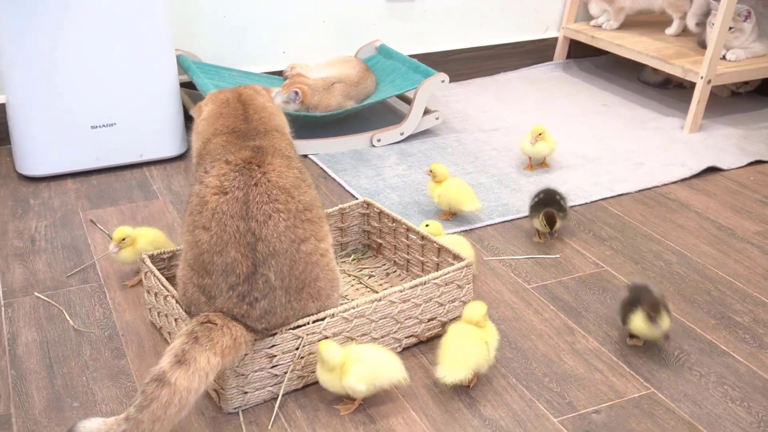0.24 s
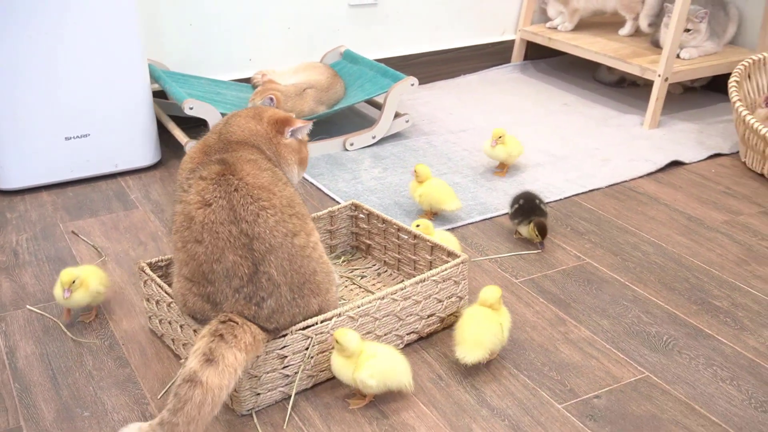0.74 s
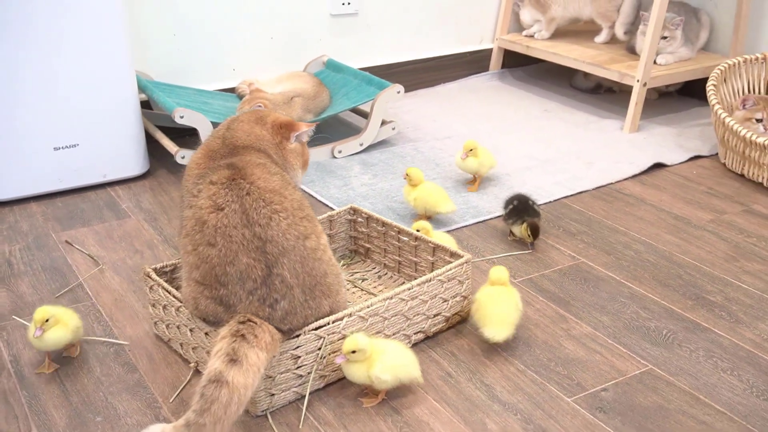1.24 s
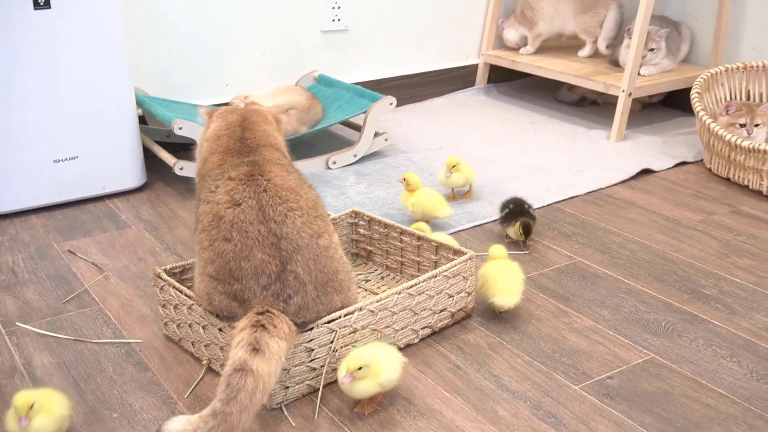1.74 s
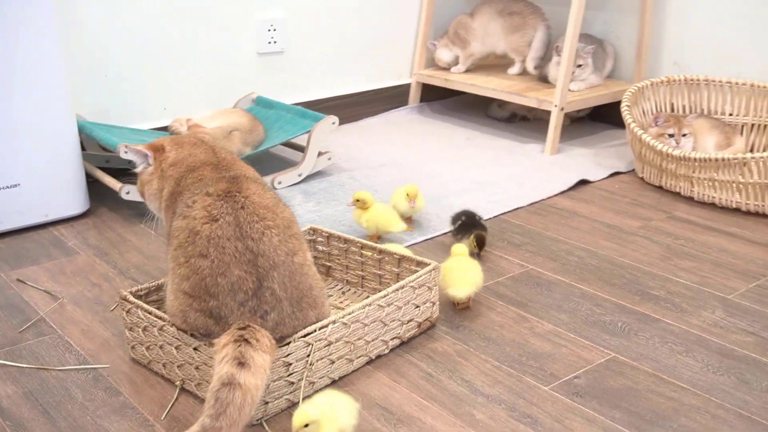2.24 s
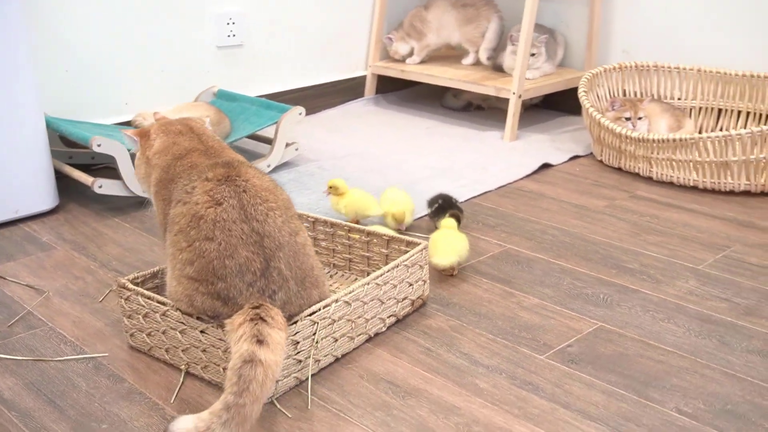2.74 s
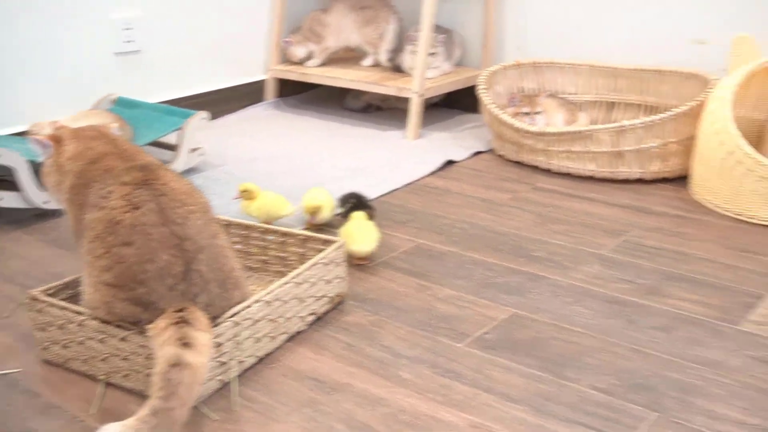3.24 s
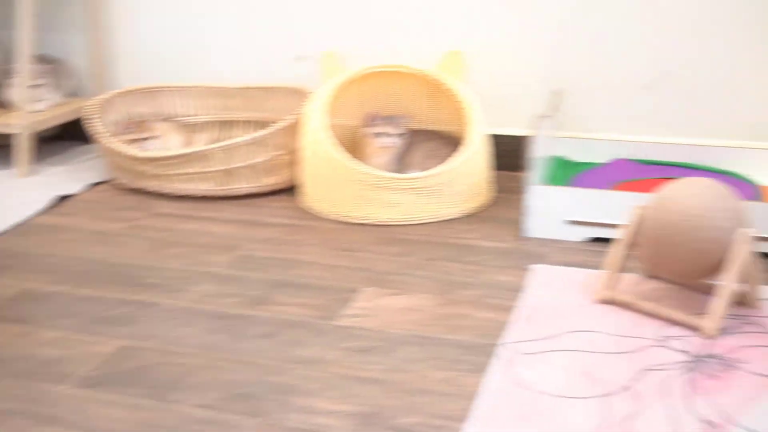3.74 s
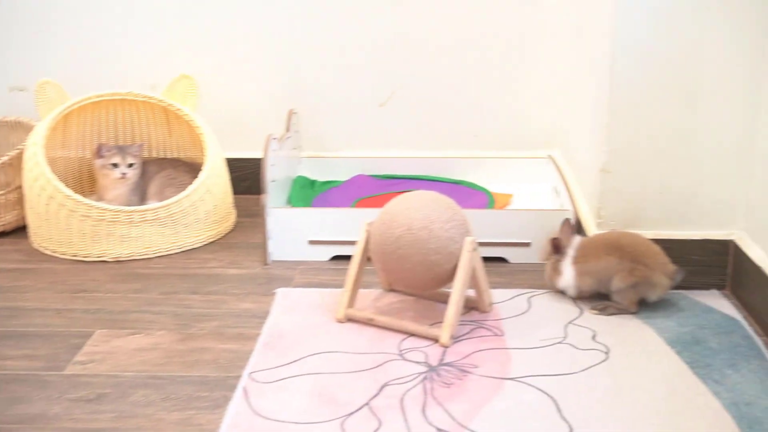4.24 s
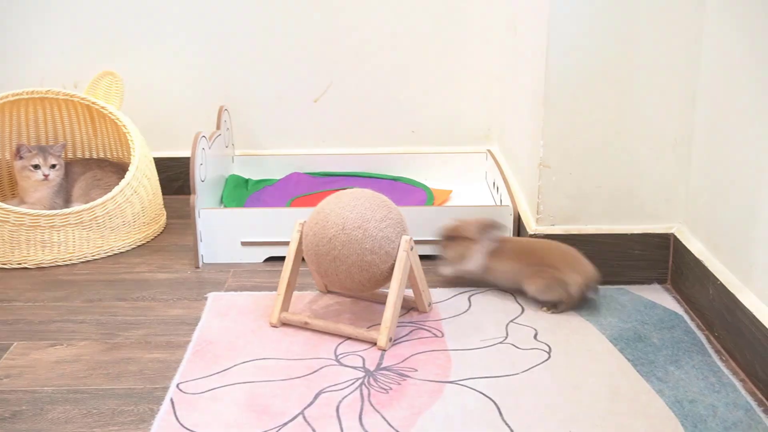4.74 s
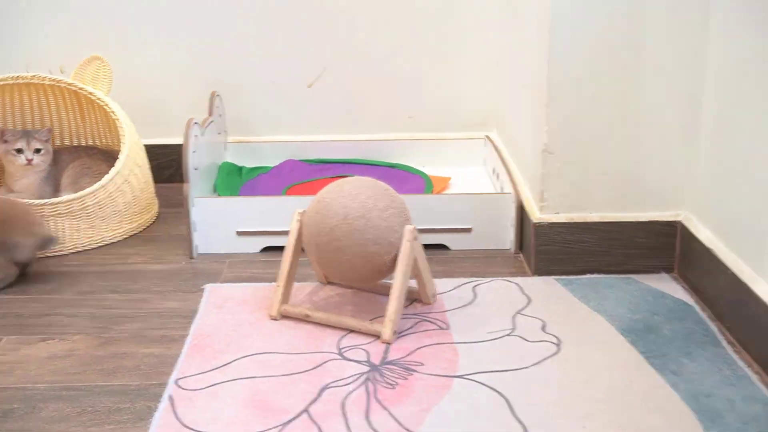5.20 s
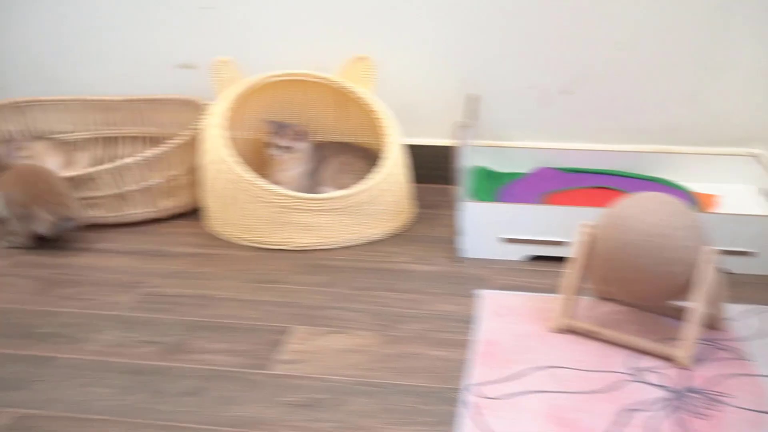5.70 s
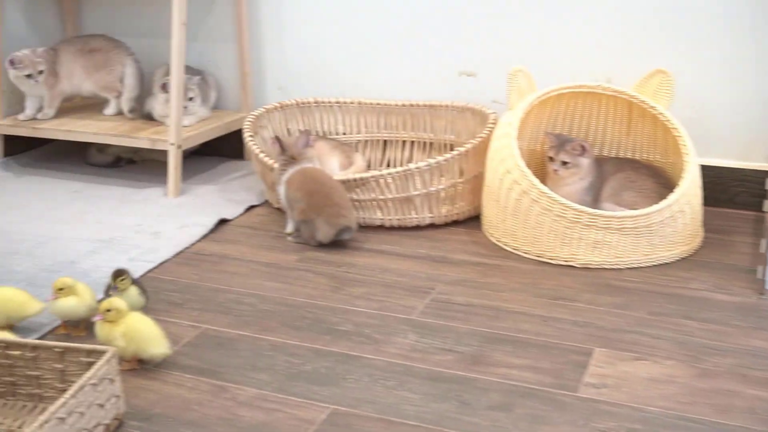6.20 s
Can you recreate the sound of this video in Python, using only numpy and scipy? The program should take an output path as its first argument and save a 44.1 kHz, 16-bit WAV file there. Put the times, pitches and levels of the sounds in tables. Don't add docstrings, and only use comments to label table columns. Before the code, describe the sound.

Bright duckling cheeps and light foot scuffs over a faint fan hum, then a rabbit bumps thin boards and peeping resumes.

```python
import sys
import numpy as np
from scipy import signal
from scipy.fft import rfft, irfft
from scipy.io import wavfile
from scipy.ndimage import uniform_filter1d

SR = 44100
rng = np.random.default_rng(int(sys.argv[2]) if len(sys.argv) > 2 else 0)


def field_ratio(decibels):
    return 10 ** (np.asarray(decibels, dtype=float) / 20)


def store_wav(level_fs):
    pcm = np.round(np.clip(np.atleast_2d(level_fs), -1, 1) * 32767)
    wavfile.write(sys.argv[1], SR, pcm.T.astype(np.int16))


N = 284886
T = np.arange(N) / SR


def unit(x):
    return x / np.sqrt(np.mean(x ** 2))


def colour(x, points):
    hz, db = np.transpose(points)
    size = x.shape[-1]
    bins = np.arange(size // 2 + 1) * SR / size + 1
    gain = field_ratio(np.interp(np.log(bins), np.log(hz), db))
    return irfft(rfft(x) * gain, size)


def band(x, low_hz, high_hz):
    edges = [low_hz, min(high_hz, .45 * SR)]
    return signal.sosfilt(signal.butter(2, edges, "band", fs=SR, output="sos"), x)


def follow(points):
    return np.interp(T, *np.transpose(points))


def late(x, delay_s):
    return np.concatenate([np.zeros(int(delay_s * SR)), x])[:N]


def add(track, start_s, sound):
    i = int(start_s * SR)
    track[i:i + len(sound)] += sound[:N - i]


def walk(rate_hz):
    hold = int(SR / rate_hz)
    jumps = np.repeat(rng.standard_normal(N // hold + 1), hold)
    smooth = uniform_filter1d(uniform_filter1d(jumps, hold), hold)
    return unit(smooth[:N])


def swells(rows, rest_db):
    bells = sum(field_ratio(db) * np.exp(-((T - s) / half_s) ** 2) for s, db, half_s in rows)
    return field_ratio(rest_db) + bells


def spread(mid, side):
    # (frequency [Hz], side minus mid [dB])
    side_points = [(60, -17), (150, -10.5), (350, -4.5), (700, -1.5), (1290, -0.5), (2600, -1.5),
                   (5000, 0.5), (15000, -1)]
    side = colour(side, side_points)
    return np.array([mid + side, mid - side])


def room(x, build_s=0.0021, sparse_db=-1.5, side_db=-3.5):
    # (frequency [Hz], fade time [s])
    fade_times = [(100, 1), (300, 0.54), (1000, 0.51), (3000, 0.57), (8000, 0.2), (15000, 0.36)]
    hz, t60 = np.transpose(fade_times)
    t = np.arange(SR) / SR
    sizes = np.minimum(rng.exponential(size=SR // 30).repeat(30), 4)
    lumps = field_ratio(sparse_db * np.exp(-t / 0.41) * sizes)
    tail = 0
    for low_hz in 44 * 2. ** np.arange(9):
        fade_s = np.interp(np.log(low_hz * 1.43), np.log(hz), t60)
        octave = band(rng.standard_normal((2, SR)) * lumps, low_hz, 2 * low_hz)
        tail = tail + octave * field_ratio(-60 * t / fade_s)
    build_up = 1 - np.exp(-(t / max(build_s, .005)) ** 2)
    tail = spread(tail[0], tail[1] * field_ratio(side_db)) * build_up
    tail = tail / np.sqrt(np.sum(tail ** 2) / 2)
    return signal.fftconvolve(x[None], tail, axes=1)[:, :N]


def contact(noise, length_s, tap=0.65):
    push = noise * np.exp(-np.arange(len(noise)) / SR / max(length_s, .002))
    push = push / np.sqrt(np.sum(push ** 2))
    push[0] += tap
    return push / np.sqrt(np.sum(push ** 2))


def air():
    # (frequency [Hz], level [dB per Hz])
    hiss_colour = [(22, -3), (113, 0.5), (600, -10), (900, -15.5), (1880, -16.5), (2500, -11),
                   (4160, -16.5), (15000, -20)]
    tone = unit(spread(*colour(rng.standard_normal((2, N)), hiss_colour)))
    whirr = unit(spread(*band(rng.standard_normal((2, N)), 768, 872))) * field_ratio(-13.0)
    return (tone + whirr) * field_ratio(-54.5 + .6 * walk(3))


def stir():
    # (time [s], bustle [dB])
    bustle_points = [(0, -42), (.21, 5), (.34, -2.5), (.7, -7), (1.06, -38), (1.93, -20), (2.34, -30),
                     (2.82, -12), (3.2, -4.5), (3.58, -4.5), (3.73, -26), (4.3, -1), (4.8, 1), (4.89, 13),
                     (5.16, -2), (5.68, -1.5), (5.9, -16.5), (6.35, -6.5)]
    # (time of crest [s], level [dB], half length [s])
    hum_swells = [
        (.25, -59, 0.28),
        (.85, -61.5, 0.12),
        (1.3, -60.5, 0.15),
        (3.71, -55, 0.057),
        (5.1, -47.5, 0.14),
        (5.98, -49, 0.2),
    ]
    # (time of crest [s], level [dB], half length [s])
    drone_swells = [
        (2.5, -67, 0.055),
        (3.55, -57, .12),
        (4.9, -53, 0.11),
        (5.18, -56, 0.17),
        (6.3, -56, 0.21),
    ]
    bustle_db = follow(bustle_points)
    sizes = np.minimum(rng.exponential(size=N // 40 + 1), 4).repeat(40)[:N]
    grains = rng.standard_normal((2, N)) * field_ratio(2.0 * sizes)
    rustle = unit(spread(*band(grains, 2100, 13200))) * field_ratio(-53 + bustle_db)
    rumble = unit(spread(*band(rng.standard_normal((2, N)), 67, 1760)))
    rumble = rumble * field_ratio(-59.5 + 0.44 * bustle_db)
    hum = unit(band(rng.standard_normal(N), 63.8, 69)) * swells(hum_swells, -87)
    drone = unit(band(rng.standard_normal(N), 104.6, 149)) * swells(drone_swells, -80.5)
    return rustle + rumble + hum + drone


def pings():
    # (time [s], pitch [Hz], level [dB], ring [s])
    notes_rung = [
        (.17, 696, -47.5, 0.014),
        (3.05, 1756, -52, 0.026),
        (4.456, 446, -56.5, 0.045),
        (4.58, 10200, -38.5, 0.0022),
        (4.799, 123, -68, 0.13),
        (4.824, 232, -44, 0.034),
        (4.898, 240.6, -34.5, 0.056),
        (4.897, 123.3, -45.5, 0.17),
        (4.905, 2216, -30.5, 0.011),
    ]
    t, dry = np.arange(SR) / SR, np.zeros(N)
    for s, hz, db, ring_s in notes_rung:
        fade = np.exp(-t / ring_s) * (1 - np.exp(-t / 0.0011))
        add(dry, s, field_ratio(db) * np.sin(2 * np.pi * hz * t) * fade)
    return 1.83 * dry + room(dry, side_db=-20.0)


def knock():
    # (pitch [Hz], level [dB], ring [s])
    board_notes = [(261.5, -0.5, 1.16), (313, -11, 0.35), (378, -19, 1.4), (522, -23, 1.4),
                   (598, -16, 0.22), (760, 3, 1), (900, -14, 1.5), (1280, -23, 0.33)]
    # (frequency [Hz], level [dB per Hz])
    crack_colour = [(100, -34), (240, 0.5), (350, -12), (650, 2.5), (1150, -16), (2600, -12), (6000, -17),
                    (15500, -33.5)]
    t = np.arange(SR // 2) / SR
    ring = 0
    for hz, db, ring_s in board_notes:
        ring = ring + field_ratio(db) * np.sin(2 * np.pi * hz * t) * field_ratio(-60 * t / (0.45 * ring_s))
    clatter = late(contact(rng.standard_normal(len(t)), .035, tap=.42), .01)
    crack = unit(colour(clatter, crack_colour))[int(.009 * SR):][:len(t)]
    blow = np.zeros(N)
    add(blow, 4.894 - .001, (0.44 * crack + 0.27 * ring) * field_ratio(-33.5))
    return 1.1 * blow + 1.5 * room(blow, side_db=-11.0)


def steps():
    # (time [s], claw click [dB], weight [dB], direct path [dB])
    patter = [(.1994, -54, -49.5, -1), (.3436, -44.5, -57, 1), (.42, -43.5, -61, -8), (.6667, -51, -73, 0),
              (.9405, -54, -70, -13), (1.8614, -53, -58, -0.5), (2.1134, -49, -53, -3),
              (2.619, -55, -53, 0), (2.8672, -59, -61.5, 15.5), (3.062, -37, -40.5, -4),
              (3.1294, -51, -55.5, -2), (3.2295, -40.5, -48, -7), (3.5002, -44, -54.5, -4),
              (3.6194, -51.5, -58.5, 1), (4.678, -65, -41.5, -1.5), (4.79, -59, -49, -12),
              (4.819, -70, -36.5, -1), (5.18, -44, -49, 1), (5.4031, -41, -41.5, -5),
              (6.4318, -47.5, -56, -7)]
    # (time [s], claw click [dB], weight [dB], direct path [dB])
    thuds = [
        (.051, -70, -65.5, 13),
        (.1289, -43, -57.5, -3),
        (.1635, -37, -46.5, -5),
        (2.9422, -73, -75, 5),
        (4.0298, -72, -60, 11),
        (4.3374, -46, -63, -8),
    ]
    # (time [s], claw click [dB], weight [dB], direct path [dB])
    drags = [
        (1.556, -49, -55.5, -21),
        (3.0121, -44, -52.5, -26),
        (4.1975, -44, -59, -5),
        (4.578, -51, -56, -2),
        (4.7289, -43, -40, 0),
    ]
    # (steps, scuff [dB], thud [dB]), both against the weight
    gaits = [(patter, 0.39, -0.94), (thuds, -25, .1), (drags, 0.14, -19)]
    feet = [(*row, scuff_db, thud_db) for rows, scuff_db, thud_db in gaits for row in rows]
    direct, far = np.zeros(N), np.zeros(N)
    scrapes = rng.standard_normal((len(feet), 4000))
    scrapes = scrapes * (1 - np.exp(-np.arange(4000) / SR / .007))
    for scrape, (s, click_db, weight_db, direct_db, scuff_db, thud_db) in zip(scrapes, feet):
        length_s = 2.3 * (0.0045 - .0004 * direct_db)
        push = contact(scrape, length_s, tap=.06)
        claw = field_ratio(click_db + 29.5) * band(push, 4040, 20000)
        scuff = field_ratio(weight_db + scuff_db + 37) * band(push, 925, 3250)
        thud = field_ratio(weight_db + thud_db + 43) * band(push, 187, 1260)
        burst = claw + scuff + thud
        add(direct, s, burst * field_ratio(direct_db - 8))
        add(far, s, burst)
    return direct + room(far, build_s=0.0083)


def peep(top_hz, end_hz, fall_s, ease, octave_db, wobble, bend=1.2):
    hook_s, scoop, rise_s = .012, .13, .016
    t = np.arange(-hook_s, fall_s, 1 / SR)
    progress = np.clip(t / fall_s, 0, 1)
    drop = 1 - (1 - progress ** bend) ** ease
    rising_hz = top_hz * (1 - scoop * (t / hook_s) ** 2)
    falling_hz = top_hz - (top_hz - end_hz) * drop
    hz = np.where(t < 0, rising_hz, falling_hz)
    phase = 2 * np.pi * np.cumsum(hz * (1 + 0.0015 * wobble[:len(t)])) / SR
    fade_in = np.sin(np.pi / 2 * np.clip((t + hook_s) / rise_s, 0, 1)) ** 2
    swell = fade_in * np.clip((fall_s - t) / .016, 0, 1)
    overtones = field_ratio(octave_db) * np.sin(2 * phase) + field_ratio(-30.5) * np.sin(3 * phase)
    return swell * field_ratio(1.44 * wobble[-len(t):]) * (np.sin(phase) + overtones), hook_s


def ducklings():
    # (time of top [s], top [Hz], end [Hz], level [dB])
    caller = [(1.578, 3860, 2460, -47.5), (1.682, 4200, 2677, -43), (1.903, 4040, 2660, -39.5),
              (2.137, 3753, 2535, -42), (2.358, 3820, 2467, -40.5), (2.577, 3410, 2410, -43),
              (2.806, 3600, 2347, -44.5), (3.072, 3260, 2615, -44.5), (3.5, 3700, 2490, -42),
              (3.691, 3845, 2690, -35.5), (3.872, 3816, 2654, -35.5), (4.056, 3820, 2685, -36),
              (4.236, 3773, 2794, -35.5), (4.622, 3620, 2746, -34.5), (4.668, 4000, 3820, -46),
              (6.248, 4220, 2630, -45.5), (6.336, 4870, 2905, -42)]
    # (time of top [s], top [Hz], end [Hz], level [dB])
    high = [(.362, 4880, 3160, -43.5), (.472, 4895, 3120, -42.5), (1.69, 4510, 3250, -48),
            (3.21, 3340, 2830, -54), (4.425, 3753, 3000, -35), (4.542, 4654, 3236, -40.5),
            (6.432, 5100, 4200, -52), (6.44, 4400, 2560, -42.5)]
    # (time of top [s], top [Hz], end [Hz], level [dB])
    deep = [(.272, 4540, 2554, -47), (.4, 3440, 2475, -54.5), (.783, 3425, 2035, -49),
            (.872, 4230, 2224, -42.5), (.993, 4060, 2227, -43.5), (1.122, 4130, 2450, -51),
            (1.797, 4980, 2990, -46), (1.919, 4850, 3490, -44.5), (3.58, 3120, 2630, -58),
            (5.395, 3230, 2163, -51.5), (5.59, 4650, 2355, -41), (5.735, 4233, 2357, -40),
            (5.778, 4540, 2223, -47), (5.84, 4280, 2520, -45.5)]
    # (time of top [s], top [Hz], end [Hz], level [dB])
    chatter = [(.1, 3450, 2400, -56.5), (.221, 4000, 2570, -48), (1.195, 3100, 2330, -68),
               (3.157, 3200, 2500, -52), (3.308, 4090, 3290, -41), (3.318, 3475, 2410, -39.5),
               (3.441, 3910, 3080, -38.5), (3.65, 2950, 2660, -61), (4.33, 3200, 2075, -43),
               (4.436, 2900, 2200, -44), (5.487, 4275, 2950, -41.5), (5.505, 3350, 2170, -43.5),
               (5.545, 4170, 3370, -40.5), (5.645, 4290, 3300, -41), (5.685, 4340, 3560, -34),
               (6.158, 3280, 2520, -60.5)]
    # (frequency [Hz], level [dB])
    throat = [(2300, -3.5), (3300, -7.5), (4000, -11), (4600, -17.5), (5300, -8.5), (7000, -5.5),
              (10000, -8), (12000, -12)]
    # (time [s], direct path [dB])
    facing = [
        (0, 4.5),
        (1.15, 1),
        (1.55, 5.5),
        (2.65, 2.5),
        (2.95, -5),
        (3.4, -6.5),
        (4.8, -7),
        (5.4, -9),
        (5.95, 4),
        (6.2, 0),
    ]
    # (time [s], left minus right [dB])
    flock = [
        (0.0, -2),
        (0.99, 1.5),
        (1.37, -0.5),
        (3.36, 0.2),
        (4.05, 1.5),
        (4.84, 1),
        (6.46, 0.7),
    ]
    # (delay [s], level [dB])
    echoes = [
        (.004, -6),
        (.015, -6),
        (.027, -10),
    ]
    # (peeps, fall [s], levelling out [1 straight to 3 strong], octave [dB])
    voices = [(caller, .043, 1.12, -26.5), (high, .05, 2.1, -28.5),
              (deep, .038, 1.3, -27.5), (chatter, .023, 1.6, -37.5)]
    peeps = [(*row, *habit) for rows, *habit in voices for row in rows]
    spots = np.zeros((3, N))
    wobbles = unit(uniform_filter1d(rng.standard_normal((len(peeps), 8000)), size=120))
    for k, (s, top_hz, end_hz, db, fall_s, ease, octave_db) in enumerate(peeps):
        fall_s += .006 * (top_hz - end_hz - 1405.5) / 1000
        voice, hook_s = peep(top_hz, end_hz, fall_s, ease, octave_db, wobbles[k])
        add(spots[k % 3], s - hook_s, voice * field_ratio(db + 15))
    spots = colour(spots, throat)
    direct = spots.sum(axis=0) * field_ratio(follow(facing) - 6)
    near = direct + sum(field_ratio(db) * late(direct, s) for s, db in echoes)
    wet = sum(room(spot) for spot in spots)
    pan_db = follow(flock)
    return (near + wet) * field_ratio(np.array([pan_db, -pan_db]) / 2)


def scene():
    return air() + stir() + pings() + knock() + steps() + ducklings()


def top_cut(x):
    return signal.sosfilt(signal.butter(12, 15750, fs=SR, output="sos"), x)


def record(dry):
    bass = signal.butter(2, 55, "high", fs=SR, output="sos")
    top = signal.ellip(8, .2, 70, 15700, fs=SR, output="sos")
    mix = signal.sosfilt(np.vstack([bass, top]), dry)
    return top_cut(mix)


dry = scene()
out = record(dry)
store_wav(out)
```